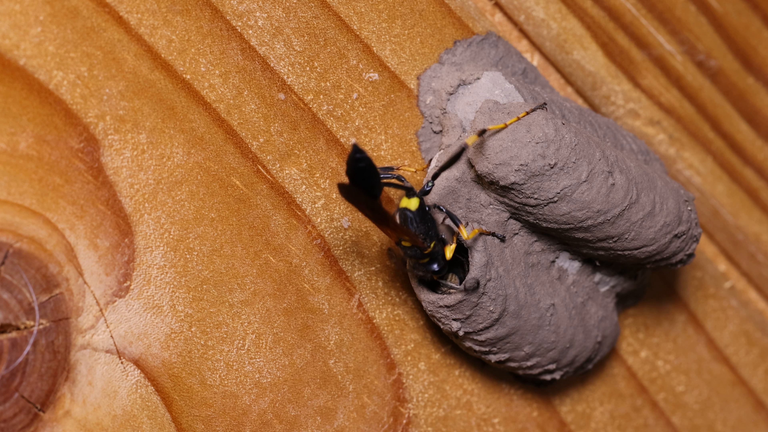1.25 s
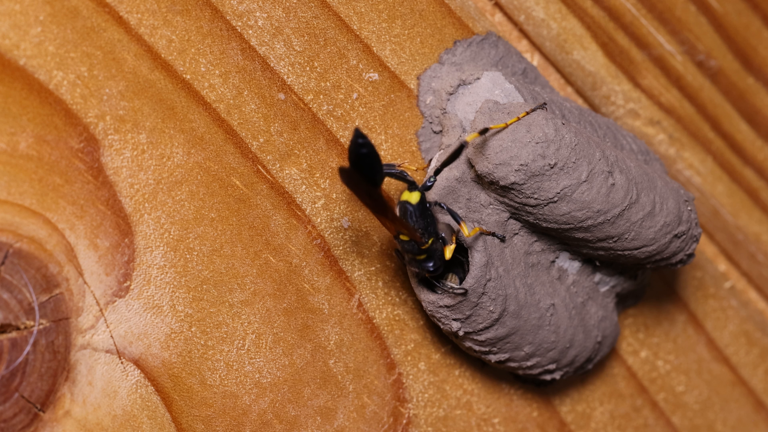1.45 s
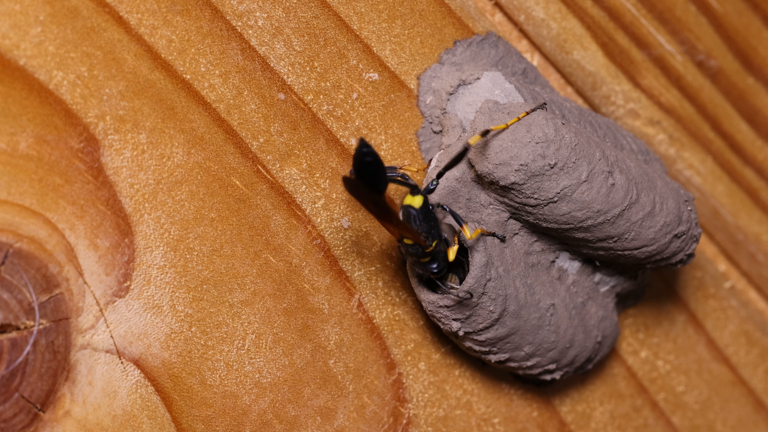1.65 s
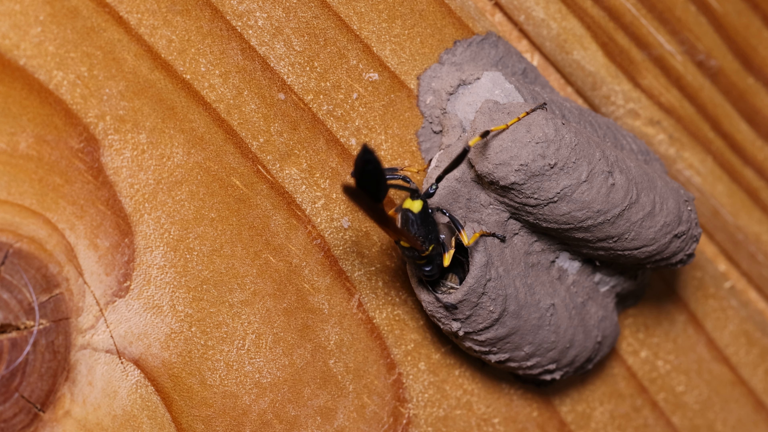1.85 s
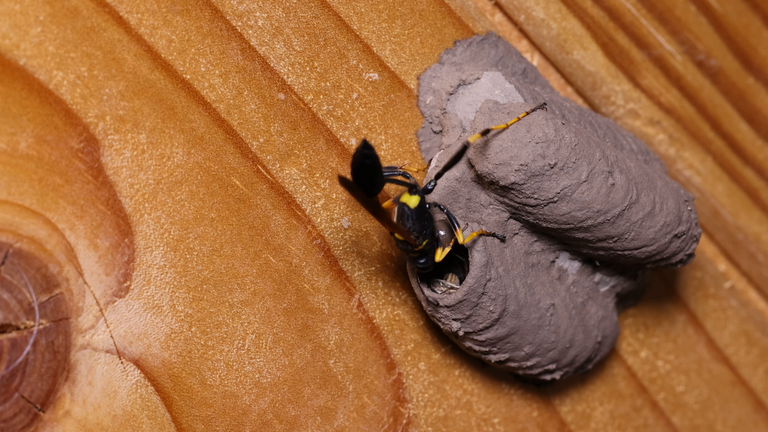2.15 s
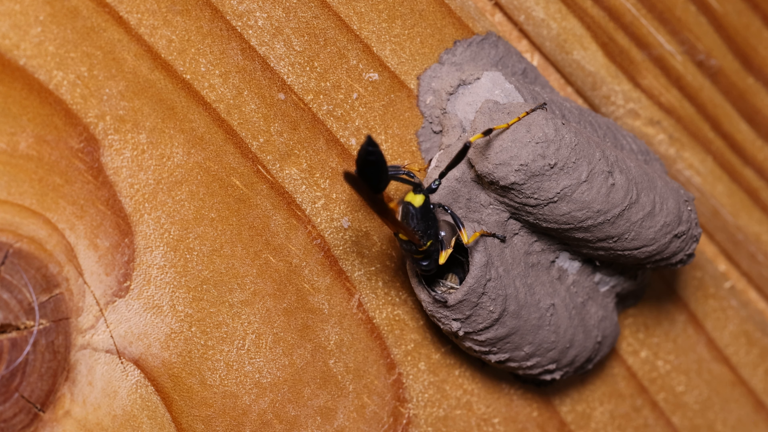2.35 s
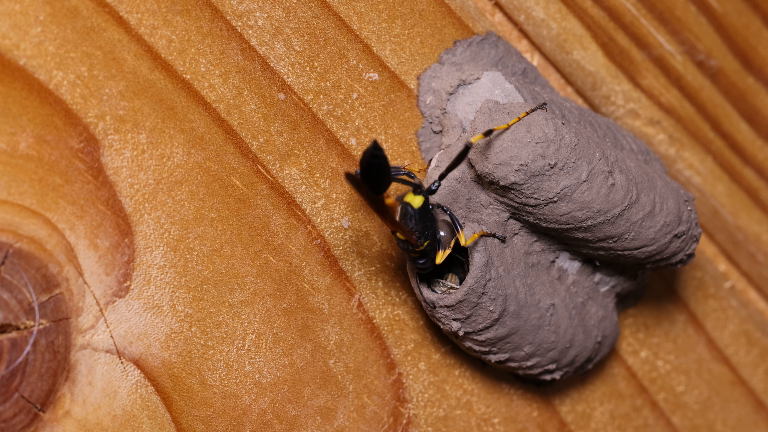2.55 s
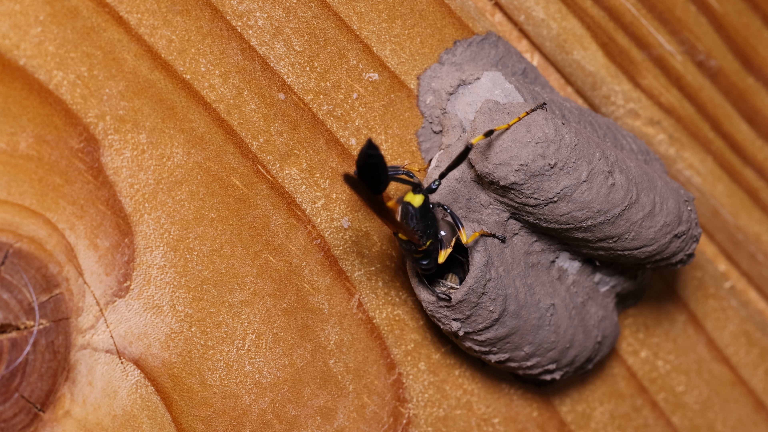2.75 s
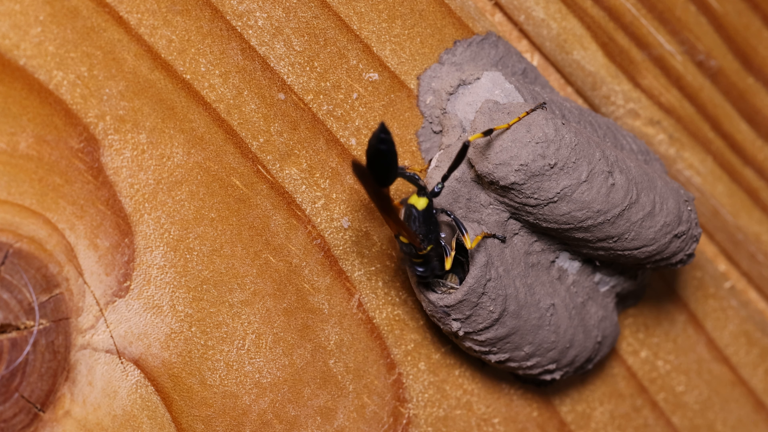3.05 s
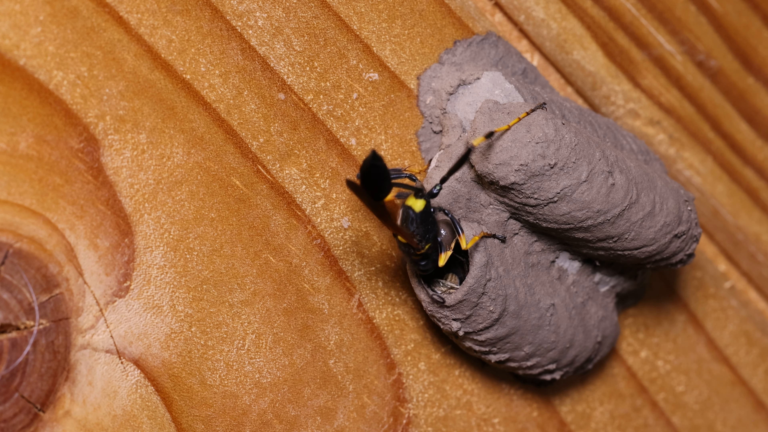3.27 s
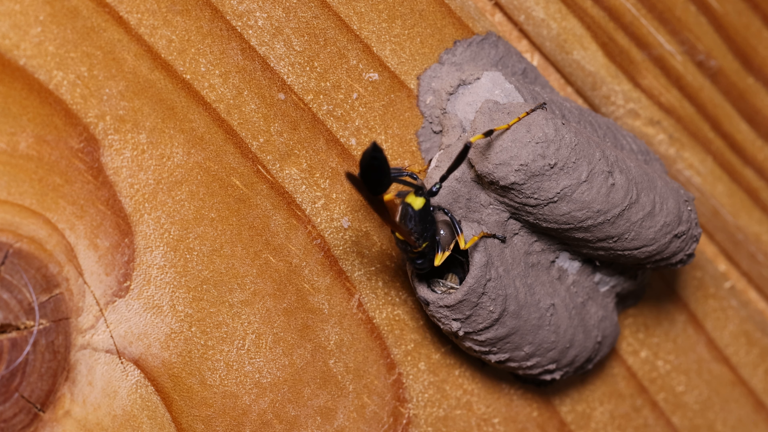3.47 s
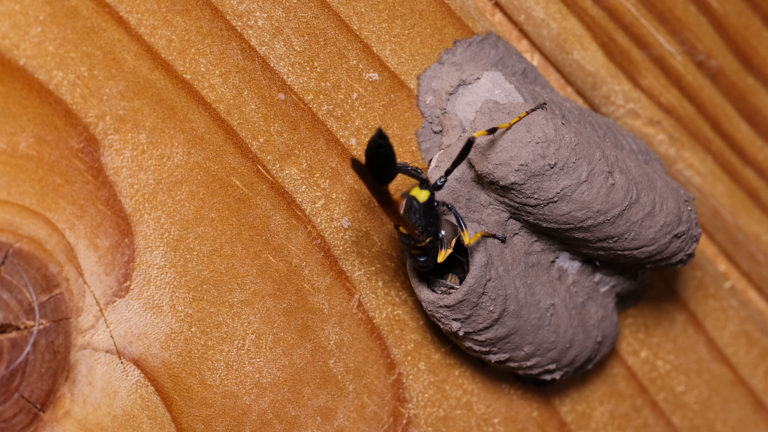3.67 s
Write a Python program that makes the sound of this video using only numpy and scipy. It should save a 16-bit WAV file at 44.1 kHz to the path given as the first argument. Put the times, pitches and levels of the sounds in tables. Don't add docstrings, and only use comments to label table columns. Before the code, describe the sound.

A wasp working at a mud nest buzzes close to the microphone after a moment of hiss; nasal, rattling strokes sag and rise in pitch almost without pause, over steady hiss and a faint thin whine.

```python
import sys
import numpy as np
from scipy import signal
from scipy.fft import rfft, irfft, next_fast_len
from scipy.io import wavfile
from scipy.ndimage import uniform_filter1d

SR = 44100
rng = np.random.default_rng(int(sys.argv[2]) if len(sys.argv) > 2 else 0)


def amplitude_ratio(level_db):
    exponent = np.asarray(level_db, float) / 20
    return 10 ** exponent


def transcribe(signal):
    frames = np.atleast_2d(signal).T
    limited = np.clip(frames, -1, 1)
    pcm = np.round(limited * 32767).astype(np.int16)
    wavfile.write(sys.argv[1], SR, pcm)


N = 168021

# [f/Hz, level/dB]
HISS = [(200, -26.5), (370, -11), (520, -1), (1400, -1.5), (5500, 2.5), (8000, -1), (12000, -13),
        (15500, -28.5)]
# [t/s, level/dB]
HISS_RISE = [(0, -2.67), (1.5, -1.67), (3.81, -0.7)]
# [f/Hz, width/Hz, level/dB]
HUM = [(1352, 60, -62), (1653, 60, -62)]
# [f/Hz, level/dB]
SHELL = [(450, -37), (655, 3), (770, -12), (1180, -8.5), (1400, 2.5), (1680, 5.5), (2200, -4), (2700, -48)]
# [f/Hz, width/Hz, level/dB]
RINGS = [(2080, 770, -6), (2715, 240, -3), (3237, 156, 2.5), (3460, 400, -4), (4590, 410, 1.5),
         (4974, 62, 5.5), (5430, 270, 5.5), (5550, 700, -7.5)]
# [t/s, muscle pitch f/Hz,
# effort level/dB, rattle against thrum level/dB]
EARLY_STROKES = [
    [(0.25, 263.7, -50.5, 10), (0.282, 276.4, -65.5, 24.5), (0.406, 284.5, -51.5, -6),
     (0.418, 295.7, -49, 1), (0.444, 280.4, -50, -1), (0.488, 285.2, -48, 3), (0.56, 267, -47.5, -6)],
    [(0.58, 261.7, -45, -7), (0.626, 280, -44.5, 0), (0.682, 282.5, -43.5, 2), (0.72, 275.3, -44, -2.5),
     (0.776, 281, -42.5, 1.5), (0.802, 305.5, -52.5, 11.5), (0.84, 289.3, -52, -2)],
    [(0.86, 311.3, -54.5, 7), (0.928, 271.7, -46.5, 0.5), (1.01, 271.5, -49.5, 5),
     (1.032, 259.7, -44.5, -7), (1.07, 254.7, -46, -9), (1.1, 248.2, -44.5, -4), (1.15, 243.2, -47.5, -2),
     (1.19, 242.5, -43, -5), (1.215, 233, -43, -6), (1.328, 231.6, -39.5, -16), (1.36, 245.4, -38, -6)],
    [(1.38, 266.5, -50.5, 6), (1.408, 278.5, -43, 6), (1.444, 276, -41, -5), (1.464, 289.1, -50, 5),
     (1.48, 293, -74, 25), (1.512, 289, -50.5, 12), (1.54, 259.5, -38.5, -6)],
]
MIDDLE_STROKES = [
    [(1.56, 225.5, -40, -5), (1.616, 227.8, -39, -12), (1.65, 215.8, -34.5, -16), (1.744, 233.8, -42, -4),
     (1.772, 226, -42, -5), (1.84, 232.7, -44.5, -1.5), (1.86, 244, -39.5, -7)],
    [(1.88, 255.1, -46, 4), (1.908, 275.2, -47.5, 10.5), (1.942, 276, -46, 7), (1.968, 289, -64, 17),
     (1.978, 288.5, -53, 11), (2.008, 281.5, -44, 4.5), (2.03, 263, -42.5, 1)],
    [(2.05, 242.3, -41, -1), (2.154, 234.4, -40, -3.5), (2.184, 241.7, -43, 1), (2.25, 243.8, -42.5, 1),
     (2.294, 251.8, -43.5, 2.5), (2.324, 272, -49.5, 14), (2.38, 299.4, -45.5, -1)],
    [(2.4, 290, -61.5, 12), (2.454, 285.4, -41, 2.5), (2.512, 269.2, -44.5, 7), (2.59, 248.2, -41, 2.5),
     (2.64, 250.7, -44, 4), (2.69, 254.6, -45, 8.5), (2.72, 289, -49.5, 10.5), (2.76, 297.5, -47.5, 5.5)],
]
LATE_STROKES = [
    [(2.78, 288.7, -53, -4), (2.838, 286.4, -48.5, 7.5), (2.88, 251.7, -42, -4), (2.98, 242.2, -42.5, 0),
     (3.058, 252.4, -43.5, 6), (3.092, 272.9, -49, 15.5), (3.12, 298.2, -48.5, 7.5),
     (3.16, 306.8, -49.5, 7.5)],
    [(3.18, 307.2, -46, -9), (3.212, 304.5, -56, 13), (3.266, 269, -45, 5), (3.312, 246.3, -41, 0.5),
     (3.362, 240.5, -43, -1), (3.45, 246.2, -42, 2), (3.52, 244.5, -43.5, 4), (3.57, 247.9, -42, 4),
     (3.612, 249, -41.5, 4), (3.63, 257.3, -40, -4)],
    [(3.64, 278.8, -48, 8.5), (3.692, 301.7, -47.5, -0.5), (3.73, 284.8, -52.5, 13),
     (3.742, 279.8, -36.5, -9), (3.762, 256.6, -44, 0), (3.786, 235, -40.5, -6), (3.81, 222.2, -43, -7)],
]
# [t/s, even partials level/dB, low shell level/dB, middle ring level/dB]
GRIP = [(.3, 2, -0.5, -9), (.45, -4.5, -3, 2), (.59, -3.5, 1, 0), (.63, -8, 0.5, 3.5), (.78, -12, 0, 5.5),
        (.95, -1.5, 1, -8), (1.1, -13.5, 5.5, 2), (1.34, -7.5, -10.5, -1.5), (1.45, -11.5, 3, 5.5),
        (1.6, -15, -9, -2), (1.82, -6, -4, -5.5), (1.95, -9, 4, 3), (2.1, -15.5, -5, -7),
        (2.17, -15, -12, -2), (2.19, -2.5, -2, -1), (2.28, -6, 1.5, 1), (2.45, -11, -2.5, -1.5),
        (2.64, -2, 0, -3), (2.78, -6, 6, 5), (2.88, -7.5, 4, -5), (2.96, -2.5, -1.5, 2.5),
        (3.05, -6, 4.5, 0), (3.15, -1.5, 2.5, 3.5), (3.3, -10.5, 7, 0), (3.42, -8, 1.5, -1.5),
        (3.6, -6, -2, 5.5), (3.8, -9, 0, -2)]
# [centre t/s, low f/Hz, high f/Hz]
SPLITS = [(.187, 7500, 8950), (.443, 5080, 6280), (.443, 12400, 13600), (.466, 8870, 10330),
          (.466, 10940, 12570), (.466, 13000, 14400), (.536, 9560, 11020), (.838, 5600, 6890),
          (.838, 13780, 15000), (.907, 8180, 10330), (1.116, 8180, 9640), (1.116, 14500, 15750),
          (1.232, 8230, 9640), (1.464, 5600, 6890), (2.463, 5600, 6890), (2.463, 8180, 9640),
          (2.463, 10330, 12950), (3.229, 11630, 13090), (3.229, 13700, 15750), (3.392, 5600, 6890),
          (3.392, 14500, 15750), (3.694, 4560, 5680), (3.694, 11020, 12320)]

HISS_DB = -38.5
WHINE_HZ, WHINE_DB, WHINE_WAVER_DB = 2444, -57.5, 3
WOBBLE, WIGGLE = 0.0025, 0.003
SHIMMER_DB, SHIMMER_PER_S = 1.6, 26
THRUM_DB, SHELL_SPLIT_HZ = 2.5, 1430
RATTLE_DB, RING_SPLIT_HZ, LOW_CUT_HZ = 2.5, 3800, 1900
RASP_DB, RASP_TURNS, RATTLE_EVEN = 2.3, 0.0022, 0.5
PUFF = 0.84
SCRAPE_DB, SCRAPE_HZ, SCRAPE_WIDTH_HZ = -9, 5660, 790
TOP_DB, TOP_HZ, TOP_WIDTH_HZ = -29, 15300, 900
FIZZ_DB, FIZZ_HZ = -6.5, 6130
FIZZ_FOLLOW, FIZZ_REST_DB = 0.77, -44.5
START_S = 0.016
LOW_NOTCH_HZ, LOW_DEPTH = 142.8, 0.97
HIGH_NOTCH_HZ, HIGH_DEPTH = 952.8, 0.99
COMB_FADE_HZ, COMB_STEEP = 6300, 11
NARROW, NARROW_HZ = 0.084, 9000
LOW_EDGE_HZ, HIGH_EDGE_HZ, EDGE_STEEP = 818, 1084, 17.4
EDGE_HZ = 15740
RUMBLE_DB, RUMBLE_HZ = -85.5, 7
SPLIT_DB = -3.5


def evened(x):
    return x / np.sqrt(np.mean(x ** 2) + 1e-20)


def read(points, hz):
    f, value = np.transpose(points)
    return np.interp(np.log(hz + 1), np.log(f + 1), value)


def over_time(rows, column):
    rows = np.array(rows)
    return np.interp(np.arange(N) / SR, rows[:, 0], rows[:, column])


def coloured(x, gain):
    size = next_fast_len(N + 4096)
    return irfft(rfft(x, size) * gain(np.fft.rfftfreq(size, 1 / SR)), size)[:N]


def bump(centre_hz, width_hz):
    return lambda f: np.exp(-((f - centre_hz) / width_hz) ** 2)


def drift(per_s, count):
    steps = np.arange(0, N + 64, 64) / SR
    f = (per_s * np.geomspace(0.1, 1, num=16))[:, None]
    phase = rng.random((count, 16, 1))
    waves = np.sin(2 * np.pi * (f * steps + phase)) / np.sqrt(f)
    return np.repeat(evened(waves.sum(1)), 64, axis=1)[:, :N]


def jitter(size):
    return evened(uniform_filter1d(rng.standard_normal(N), size=size))


def hiss():
    noise = evened(coloured(rng.standard_normal(N), lambda f: amplitude_ratio(read(HISS, f))))
    bass = coloured(noise, lambda f: f < 1000)
    return amplitude_ratio(HISS_DB) * (bass + amplitude_ratio(over_time(HISS_RISE, 1)) * (noise - bass))


def whine():
    level, bend = drift(8.25, count=2)
    tone = np.sqrt(2) * np.sin(2 * np.pi * np.cumsum(WHINE_HZ + 0.33 * bend) / SR)
    tone *= amplitude_ratio(WHINE_DB + uniform_filter1d(WHINE_WAVER_DB * level, size=64))
    for hz, width, db in HUM:
        hum = coloured(rng.standard_normal(N), lambda f: 1 / (1 + ((f - hz) / width * 2) ** 2))
        tone += amplitude_ratio(db) * evened(hum)
    return tone


def ringing(f):
    return sum((-1) ** k * amplitude_ratio(db) / (1 + 2j * (f - hz) / width)
               for k, (hz, width, db) in enumerate(RINGS))


def grit(turns):
    puffs = rng.standard_normal(N) * np.exp(-(turns % 1) / PUFF)
    scrape = coloured(puffs, bump(SCRAPE_HZ, SCRAPE_WIDTH_HZ))
    sizzle = coloured(puffs, bump(TOP_HZ, TOP_WIDTH_HZ))
    fizz = coloured(puffs, lambda f: amplitude_ratio(read(HISS, f)) / (1 + (FIZZ_HZ / (f + 1)) ** 90.0))
    return evened(scrape), evened(sizzle), evened(fizz)


def thrum_and_rattle(hz, turns, wander):
    even_db, shell_db, ring_db = (over_time(GRIP, c) for c in (1, 2, 3))
    slip = RASP_TURNS * jitter(180)
    flicker = drift(40, count=41)
    thrum, rattle = np.zeros((2, N))
    for k in range(1, 34):
        f = k * hz
        grip_db = even_db * (1 - k % 2)
        shimmer_db = uniform_filter1d(SHIMMER_DB * wander[k], size=64)
        thrum_db = read(SHELL, f) + grip_db + shell_db / (1 + (f / SHELL_SPLIT_HZ) ** 10)
        thrum += np.cos(2 * np.pi * k * turns) * amplitude_ratio(shimmer_db) * amplitude_ratio(thrum_db)
        rasp_db = uniform_filter1d(RASP_DB * flicker[k], size=64)
        rasp_db = rasp_db + RATTLE_EVEN * grip_db * (k < 11)
        rattle_gain = amplitude_ratio(rasp_db + ring_db / (1 + (f / RING_SPLIT_HZ) ** 20))
        low_cut = 1 + (LOW_CUT_HZ / f) ** 8.7
        rattle += np.cos(2 * np.pi * k * (turns + slip)) * rattle_gain / low_cut
    return evened(thrum), evened(coloured(rattle, ringing))


def wasp():
    rows = np.concatenate([*EARLY_STROKES, *MIDDLE_STROKES, *LATE_STROKES])
    hz, effort_db, rattle_db = (over_time(rows, c) for c in (1, 2, 3))
    wander = drift(SHIMMER_PER_S, count=41)
    turns = np.cumsum(hz * (1 + WOBBLE * jitter(300) + WIGGLE * wander[0])) / SR
    thrum, rattle = thrum_and_rattle(hz, turns, wander)
    scrape, sizzle, fizz = grit(turns)
    bright = amplitude_ratio(RATTLE_DB) * rattle + amplitude_ratio(SCRAPE_DB) * scrape
    press = amplitude_ratio(THRUM_DB) * thrum + amplitude_ratio(rattle_db) * bright + amplitude_ratio(TOP_DB) * sizzle
    fizz_db = FIZZ_DB + FIZZ_REST_DB + FIZZ_FOLLOW * (effort_db + rattle_db - FIZZ_REST_DB)
    begun = np.clip((np.arange(N) / SR - rows[0, 0]) / START_S, 0, 1)
    return begun * (amplitude_ratio(effort_db) * press + amplitude_ratio(fizz_db) * fizz)


def scene():
    return np.tile(hiss() + whine() + wasp(), (2, 1))


def combs(f):
    bass_cut = f ** 2 / (f ** 2 + 110 ** 2)
    low = bass_cut * (1 - LOW_DEPTH * np.exp(-2j * np.pi * f / LOW_NOTCH_HZ)) / 2
    depth = HIGH_DEPTH / (1 + (f / COMB_FADE_HZ) ** COMB_STEEP)
    late = depth * np.exp(-2j * np.pi * f / HIGH_NOTCH_HZ)
    back = np.minimum(NARROW + (f / NARROW_HZ) ** 2 / 2, 0.85)
    high = (1 - late) / (1 - back * late) * (1 + back * depth) / (1 + depth)
    low = low / (1 + (f / LOW_EDGE_HZ) ** EDGE_STEEP)
    high = high / (1 + (HIGH_EDGE_HZ / (f + 1)) ** EDGE_STEEP)
    return (low + high) * (f < EDGE_HZ)


def rumble(mid):
    floor = coloured(rng.standard_normal(N), lambda f: (f < 400) / np.sqrt(1 + f / RUMBLE_HZ))
    swell = evened(np.sqrt(abs(uniform_filter1d(mid ** 2, size=2000))))
    return amplitude_ratio(RUMBLE_DB) * evened(floor) * swell


def side_patches(mid):
    side = np.zeros(N)
    window = signal.windows.kaiser_bessel_derived(2048, 4 * np.pi)
    hz = np.fft.rfftfreq(2048, 1 / SR)
    for s, lo, hi in SPLITS:
        at = slice(round(s * SR) - 1024, round(s * SR) + 1024)
        band = (hz > lo) * (hz < hi)
        level = np.std(irfft(rfft(mid[at]) * band))
        noise = evened(irfft(rfft(rng.standard_normal(2048)) * band))
        side[at] += amplitude_ratio(SPLIT_DB) * level * window * noise
    return side


def band_limit(x):
    return signal.sosfilt(signal.butter(12, 15760, fs=SR, output="sos"), x)


def record(dry):
    mid = coloured(dry[0], combs)
    mid = mid + rumble(mid)
    side = side_patches(mid)
    return band_limit(np.array([mid + side, mid - side]))


dry = scene()
out = record(dry)
transcribe(out)
```